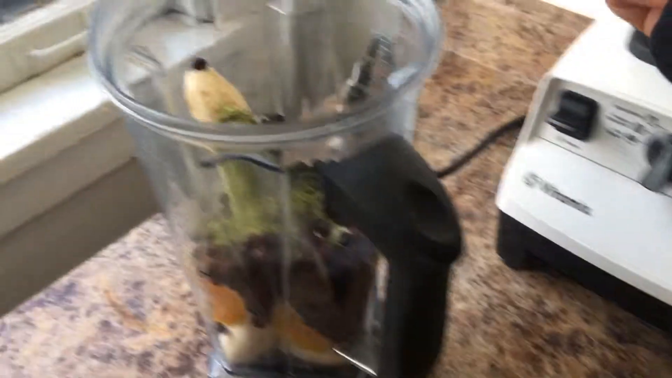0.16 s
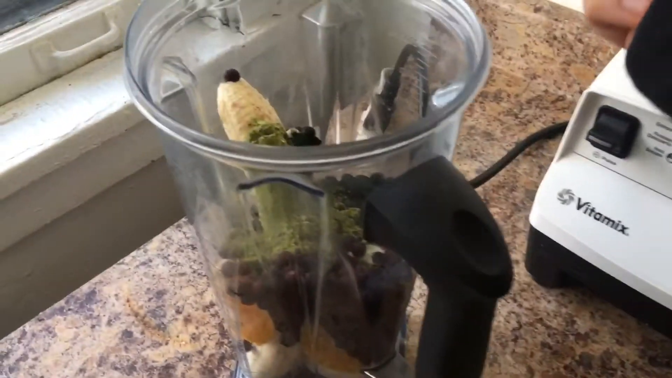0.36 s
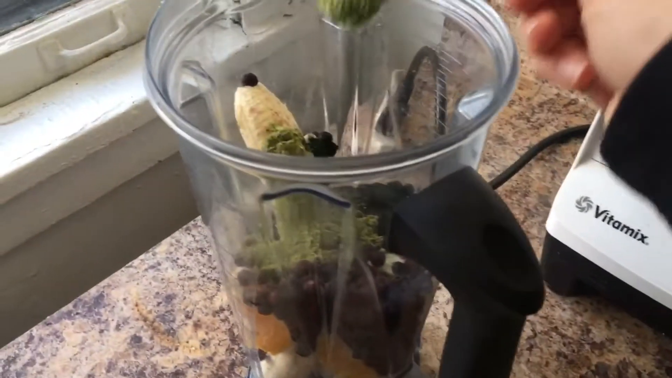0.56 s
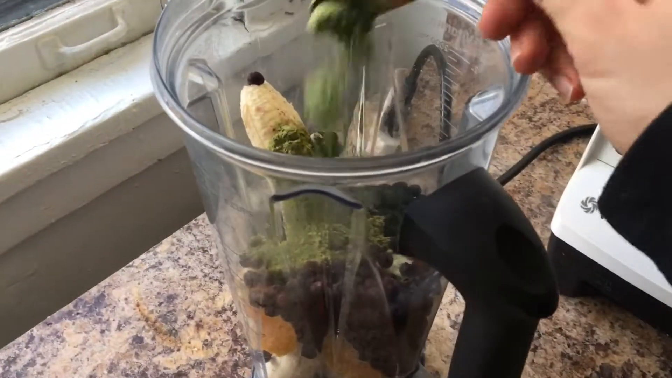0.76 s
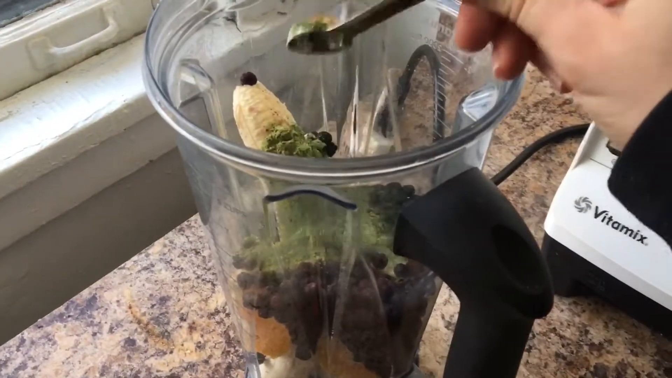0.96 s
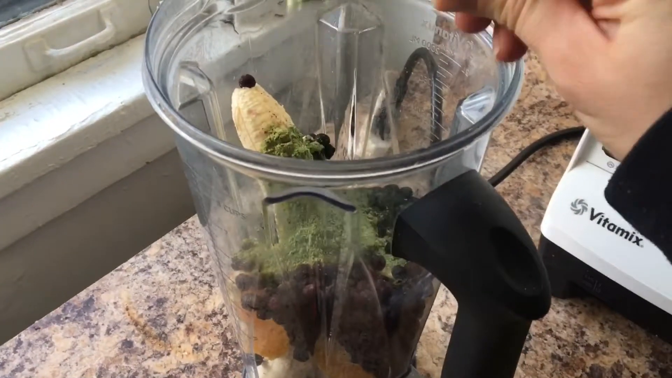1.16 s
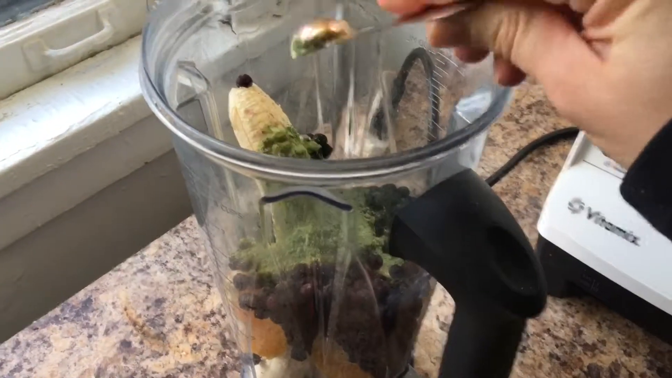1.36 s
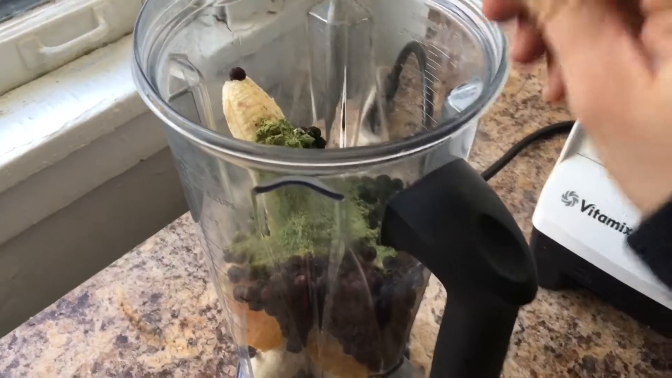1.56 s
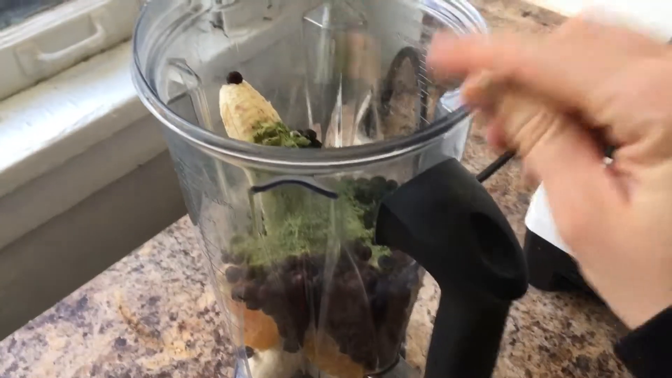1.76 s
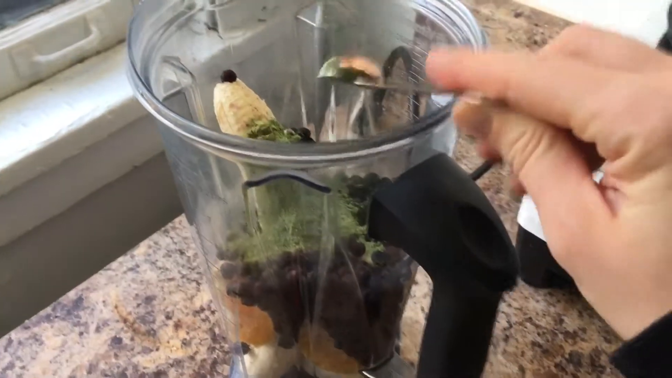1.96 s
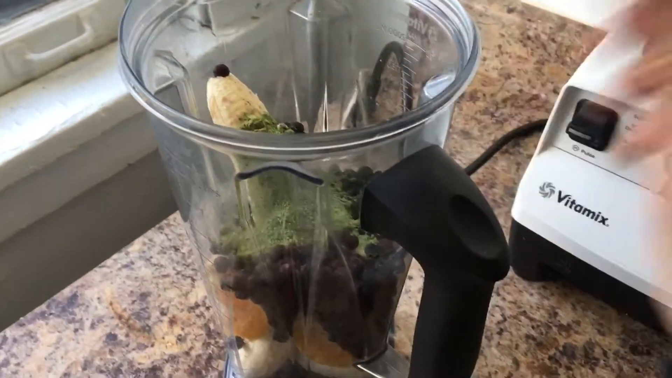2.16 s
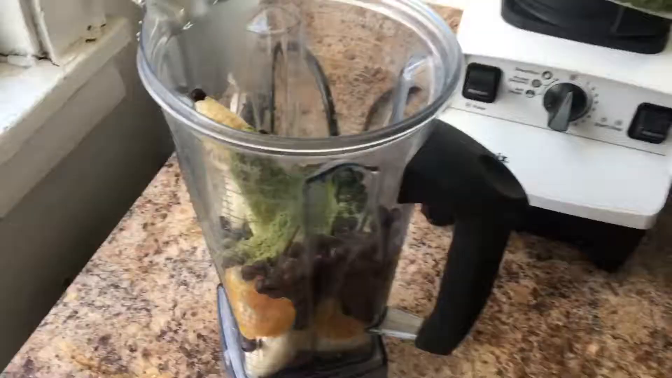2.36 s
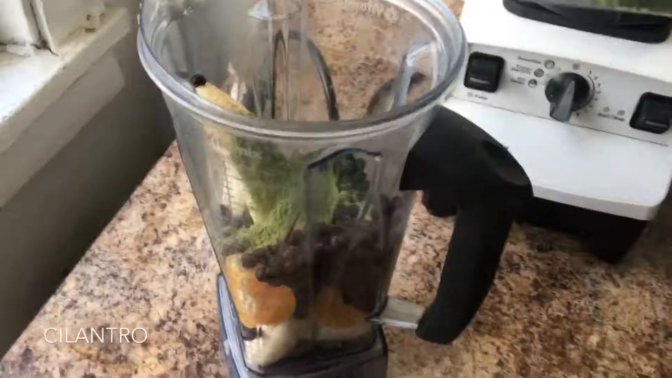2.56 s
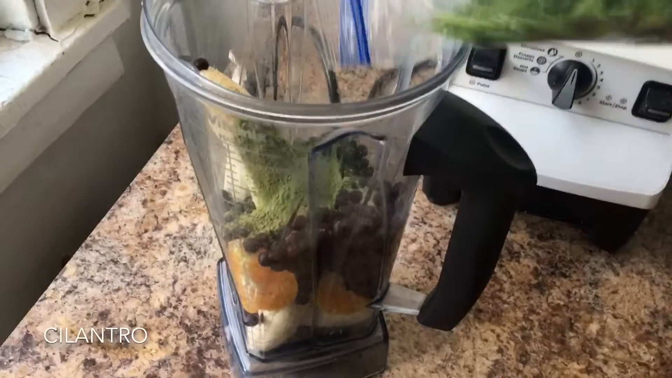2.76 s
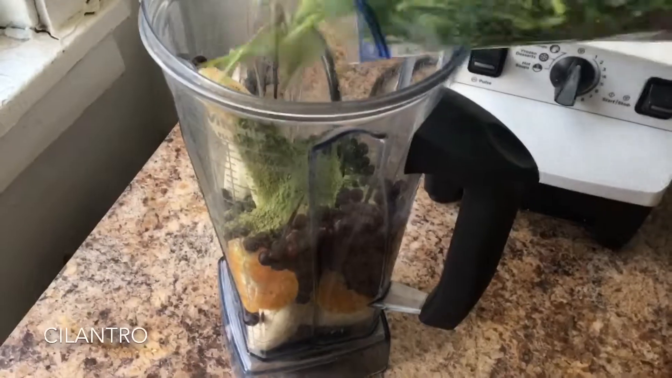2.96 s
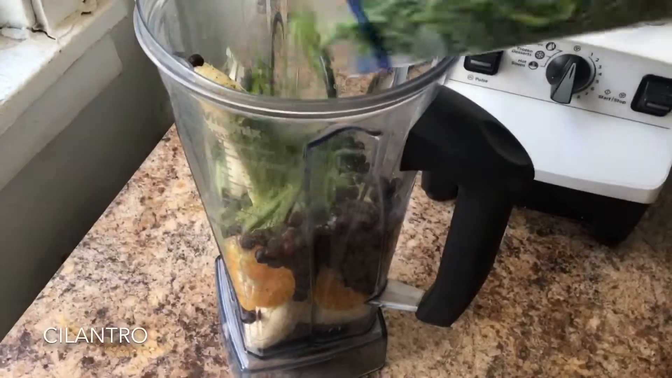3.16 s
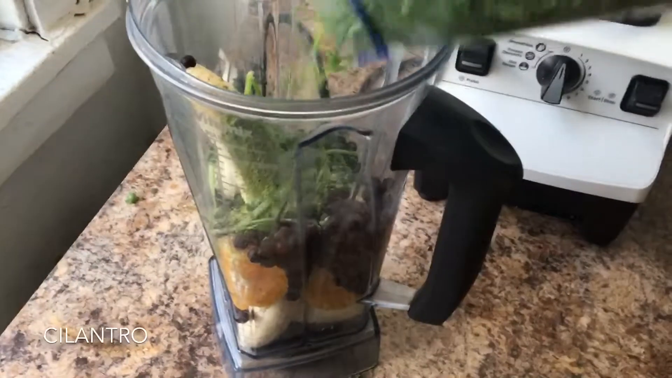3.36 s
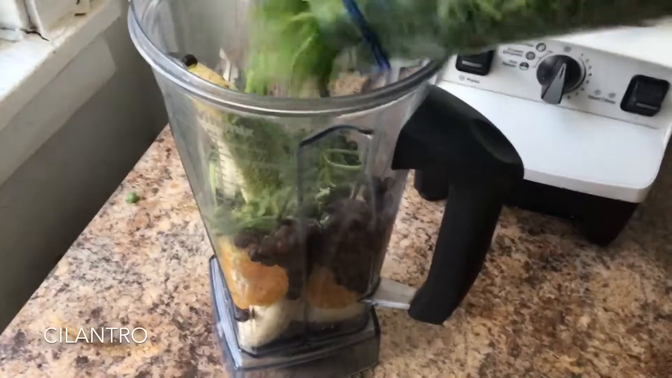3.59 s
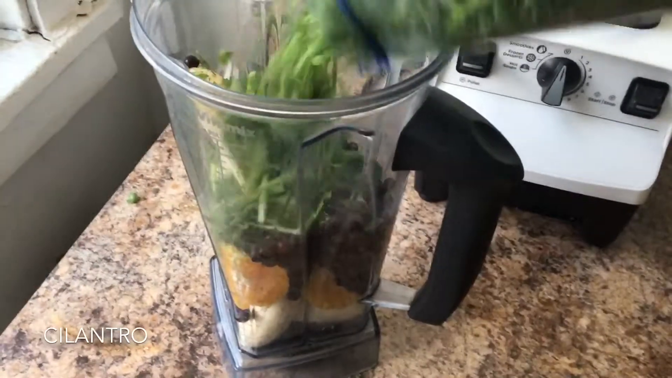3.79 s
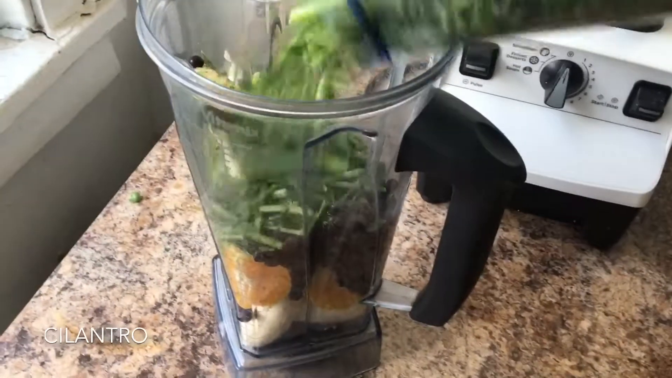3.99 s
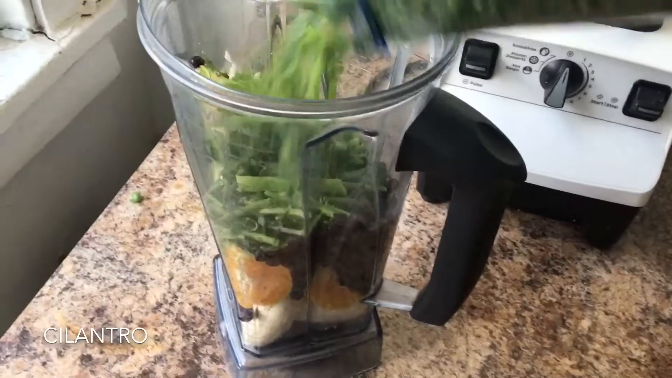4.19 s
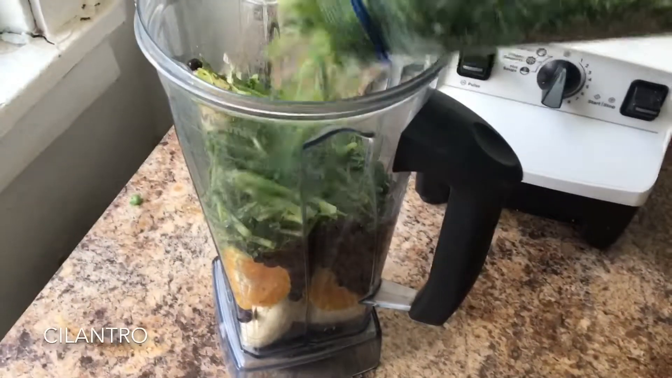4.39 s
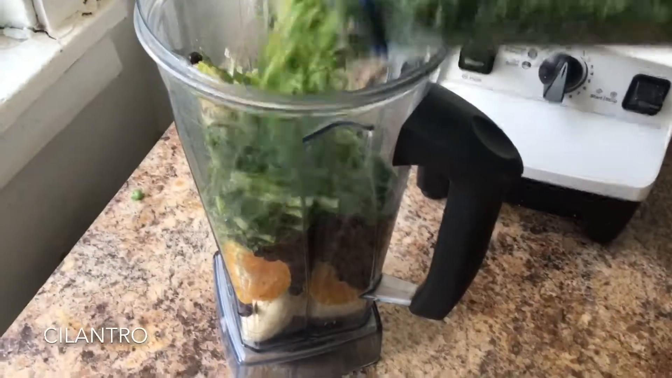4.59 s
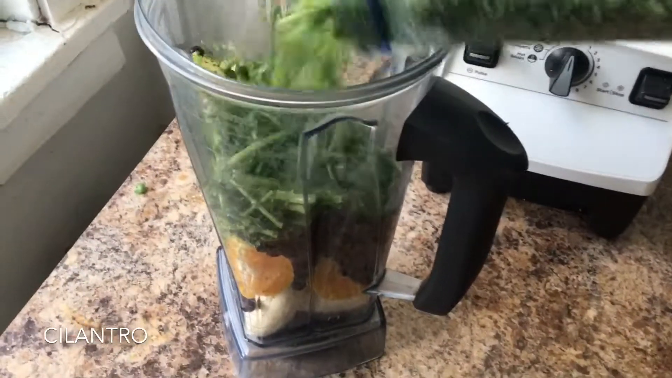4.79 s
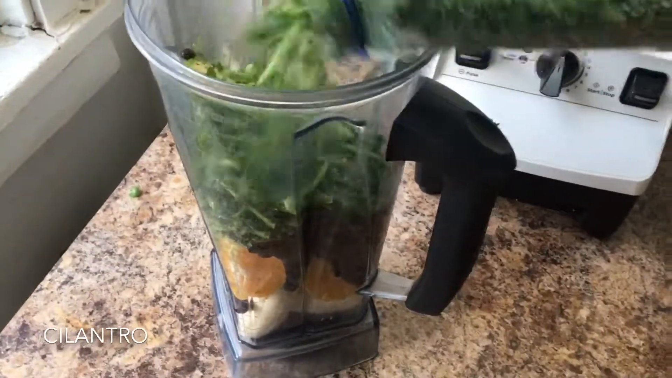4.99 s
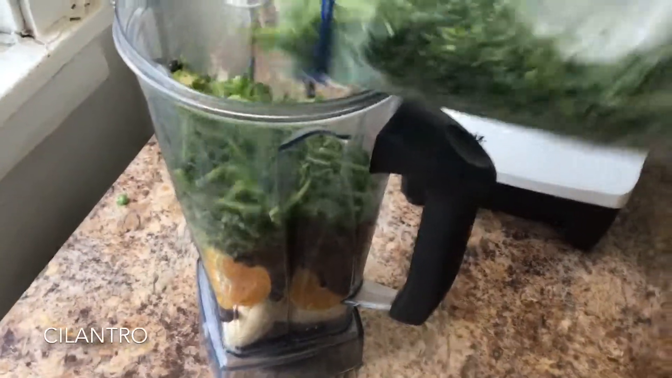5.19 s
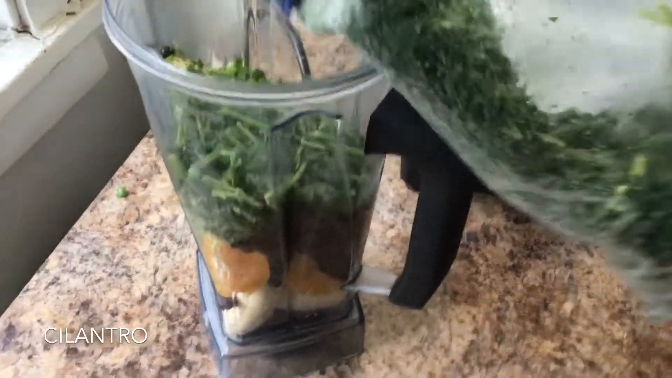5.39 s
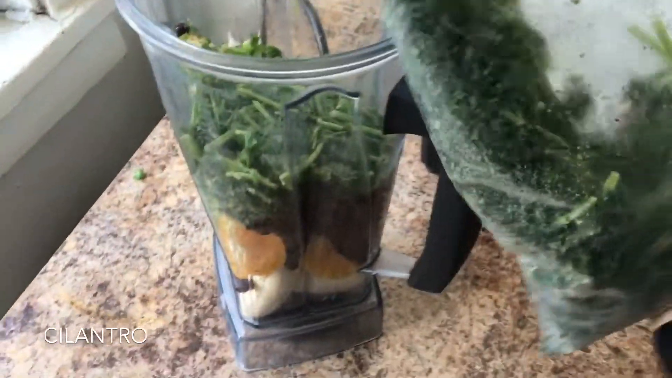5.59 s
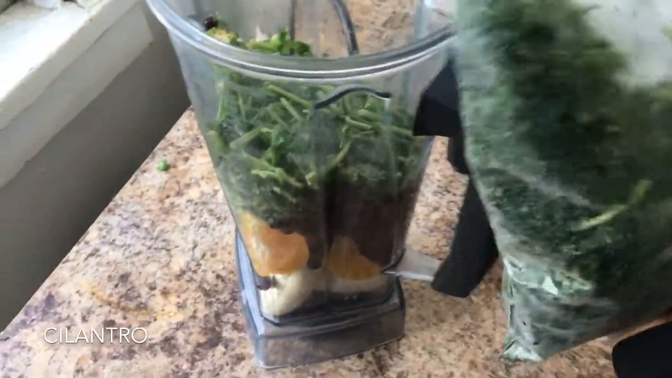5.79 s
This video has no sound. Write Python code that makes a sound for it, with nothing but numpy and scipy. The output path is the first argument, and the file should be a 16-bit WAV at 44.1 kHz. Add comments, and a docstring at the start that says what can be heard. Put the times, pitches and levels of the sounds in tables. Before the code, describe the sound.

In a small kitchen with low rumble and faint hiss, powder lands almost inaudibly in a plastic blender jar. A spoon lightly touches the rim, then knocks three times, loud and hollow with a bright clack. Then chopped herbs slide from a thin plastic bag and are shaken in, about five rustling bursts a second, with crackles and small snaps, before the bag is drawn away. Close microphone, short room reflections.

```python
"""A small kitchen, one close microphone: a plastic blender jar on a counter, over low rumble and faint hiss.
Powder drops in as a puff of noise; a spoon touches the rim, then knocks three times, ringing jar and counter modes.
Herbs slide from a thin plastic bag, are shaken in about five times a second, and the crinkling bag is drawn away:
crackles of short resonant clicks and noise bursts follow the slide and the shakes, with single snaps on top.
The air in the jar colours powder and herbs; sparse decaying reflections give the room."""
import sys
import numpy as np
from scipy import signal
from scipy.fft import rfft, irfft, next_fast_len
from scipy.io import wavfile

SR = 44100
rng = np.random.default_rng(int(sys.argv[2]) if len(sys.argv) > 2 else 0)


def generate_wav(sig):
    """Save sig (samples, or channels by samples) to the path in sys.argv[1] as 16-bit PCM at SR."""
    pcm = np.round(np.clip(np.atleast_2d(sig).T, -1, 1) * 32767).astype(np.int16)
    wavfile.write(sys.argv[1], SR, pcm)


N = 257808
TIME = np.arange(N) / SR

# spectra below are shapes only, evened out to rms 1 before a level is set
# the kitchen's background spectrum: freq_hz, density_db (per Hz)
HUM_SPECTRUM = [(12, -62), (25, -21), (42, -7), (80, -8), (120, -14.5), (229, -12), (317, -15.5),
                (450, -25.5), (680, -26), (863, -31), (1290, -30), (1600, -35.5), (3000, -41.5),
                (14000, -48), (16000, -58)]
# kitchen reverberation: freq_hz, t60_s
KITCHEN_T60 = [(60, 0.73), (250, 0.28), (700, 0.18), (2000, 0.36), (5000, 0.17), (14000, 0.32)]
# air resonances of the open jar: freq_hz, width_hz, level_db (over the direct sound)
JAR_AIR = [(295, 30, 6), (551, 99, -7.5), (882, 50, -1), (1232, 59, -4.5), (2180, 150, -2),
           (3190, 46, -3.5)]
# soft landings in the jar, herbs or powder, spectrum: freq_hz, density_db (per Hz)
THUD_SPECTRUM = [(27, -24), (42, 1.5), (60, -1.5), (110, -6.5), (170, -3.5), (220, -2), (290, -7),
                 (400, -4), (900, -40)]
# a spoonful of powder dropping softly into the jar: centre_s, spread_s, level_db
SPOONFUL = (0.83, 0.079, -63)
# spoon on the rim: start_s, strength_db, brightness_db (per octave), clatter_db (relative to the blow)
KNOCKS = [(1.7301, -30.5, 0.6, -2.5), (1.8702, -2.55, 1, -4.5), (2.0218, -4, 1.1, -8),
          (2.1353, -4.5, 2.5, -4)]
# jar standing on the counter, struck at the rim: pitch_hz, width_hz, level_db (mean over blows), delay_s
JAR_MODES = [(54, 10, 22, .022), (151, 15, 20, .012), (303, 30, 20.5, .005), (421, 50, 19.5, .007),
             (533, 60, 21, .003), (646, 100, 19.5, .003), (955, 200, 10, .003), (1305, 120, 21.5, .0046),
             (1430, 200, 12, .004), (1662, 90, 14, .003), (2010, 200, 20.5, .0013),
             (2220, 170, 23.5, .0014), (2855, 250, 6, .0015), (3560, 280, 12.5, .0013),
             (4560, 300, 6.5, .0015), (5420, 450, -1, .0014), (7020, 420, 2, .001), (8850, 550, -1, .0004),
             (11850, 700, -7, .0002)]
# the steel spoon's own thin ring: pitch_hz, width_hz, level_db
SPOON_RING = [(12030, 12, 3)]
# what a knock sends into the room, spectrum: freq_hz, density_db (per Hz)
KNOCK_ROOM = [(27, -21), (40, 4), (60, -3), (150, 3.5), (230, -0.5), (600, 5.5), (1080, -8.5), (1330, 2),
              (1750, -4), (2150, 0), (2650, -14), (3700, -4.5), (5500, -12.5), (9000, -26.5), (15000, -54)]
# a crease flips or a stem hits the wall: start_s, level_db (before the common trim in snaps()), pitch_hz,
# slope_db (per octave above the pitch)
SNAPS = [(2.474, -39, 2000, -3), (3.021, -29, 3000, -4), (3.084, -25, 2500, -4), (3.152, -20.5, 1800, -5),
         (3.177, -28, 9000, -3), (3.1927, -20, 2700, -4.5), (3.456, -23, 2600, -6),
         (3.7335, -25.5, 1450, -3), (3.773, -27, 1700, -4), (3.889, -21, 1600, -9), (4.131, -28, 10500, -3),
         (4.270, -26, 1000, -6), (4.288, -19, 850, -5), (4.564, -26.5, 1300, -4), (4.759, -28, 750, -7),
         (4.907, -26.5, 2000, -6), (5.107, -33, 3500, -2), (5.165, -35.5, 2500, -3),
         (5.1915, -32, 1850, -5), (5.213, -29.5, 2200, -3), (5.305, -34, 2500, -4), (5.334, -36, 6000, -3),
         (5.547, -35, 1600, -5), (5.6105, -27.5, 1350, -7.5), (5.6535, -26, 1750, -4)]
# colour of the leaves: freq_hz, density_db (per Hz)
LEAF_SPECTRUM = [(100, -12), (250, -16), (560, -2.5), (730, -2), (1050, 0), (1400, 1.5), (1750, -2.5),
                 (2400, -3), (2800, -5), (4200, -4), (4900, -14.5), (6000, -10.5), (7500, -12),
                 (12000, -20)]
# colour of the bag's film: freq_hz, density_db (per Hz)
FILM_SPECTRUM = [(1000, -35), (4500, -6.5), (6300, -5.5), (7500, -8.5), (9000, -4.5), (9900, -8),
                 (10500, -12), (11300, -6.5), (13000, -8.5), (16000, -14.5)]
# steady slide of herbs along the tilted bag, then the bag drawn away: time_s, level_db (before layer trims)
SLIDE = [(2.46, -56), (2.62, -37.5), (2.81, -34), (3.0, -30.5), (3.13, -36.5), (3.54, -41.5), (4.35, -39),
         (4.51, -46.5), (4.92, -43.5), (5.16, -52), (5.33, -51.5), (5.37, -53), (5.55, -43.5), (5.85, -40)]
# how strongly the film crinkles beside the leaves, rising and falling through the pour:
# time_s, film_db (relative to the slide, before layer trims)
FILM_BALANCE = [(2.55, -9), (3.25, -4), (3.56, -8.5), (3.8, 1), (4.35, -1.5), (5.13, 4.5), (5.4, -3),
                (5.85, -1)]
# shakes of the bag: full_speed_s, rustle_db, crinkle_db (both before layer trims), thud_db, hold_s
SHAKES = [(2.498, -46.5, -50, -59, 0.02), (2.597, -43, -55, -46, 0.015), (2.78, -32, -40, -41, 0.013),
          (2.837, -30, -38, -51, 0.013), (2.961, -29, -48, -38, .025), (3.048, -34, -40, -70, .03),
          (3.242, -38.5, -41.5, -50, 0.06), (3.428, -32.5, -37, -48, 0.024),
          (3.616, -24.5, -31, -39.5, 0.02), (3.778, -30.5, -36.5, -45.5, 0.057),
          (4.004, -30, -33.5, -45, 0.013), (4.189, -30.5, -35, -46, 0.0053),
          (4.388, -29, -30.5, -42.5, 0.016), (4.571, -36, -36, -55, 0.042), (4.69, -60, -41, -54, 0.0088),
          (4.792, -34, -35, -44, .028), (4.98, -35.5, -37, -49, 0.024), (5.086, -47, -40.5, -68, .01),
          (5.225, -44, -43, -63, 0.03)]

HUM_DB, HUM_POUR_DB = -56, -58.5  # background level up to the dip and from there on
DIP_S, DIP_WIDTH_S, DIP_DB = 2.442, 0.012, -12  # the background dips briefly just before the pour
POUR_START_S = 2.452
SHAKE_RISE_S, SHAKE_SETTLE_S = 0.014, 0.031  # exponential time constants of each shake
FALL_S = 0.011  # leaves shaken loose land this much later
LANDING_DB = -9  # thud of the leaves that slide out at the pour's start, relative to the slide
HEAP_DB_PER_S = 1.24  # the growing heap cushions what slides out
CATCH_DB, CATCH_HZ = 1.16, 34.6  # leaves catch and slip: rms depth and top rate of the unevenness
EDGE_HZ = 16050  # upper band edge of the recorder


def gain_of(db):
    """Decibels to amplitude."""
    return 10 ** (np.asarray(db) / 20)


def evened(x):
    """Scales to rms 1."""
    return x / np.sqrt(np.mean(x ** 2) + 1e-20)


def read(points, hz):
    """Reads a table on a logarithmic frequency axis."""
    freq_hz, value = np.transpose(points)
    return np.interp(np.log(hz + 1), np.log(freq_hz + 1), value)


def curve(rows):
    """Reads a timed table at every sample."""
    return np.interp(TIME, *np.transpose(rows))


def add(mix, start_s, sound):
    """Mixes a sound in at its start time, cut off at the end of the mix."""
    part = mix[round(start_s * SR):][:len(sound)]
    part += sound[:len(part)]


def coloured(x, spectrum):
    """Gives x a spectral colour, at rms 1."""
    hz = np.fft.rfftfreq(len(x), 1 / SR)
    return evened(irfft(rfft(x) * gain_of(read(spectrum, hz)), len(x)))


def resonances(modes, hz):
    """Complex response of each damped mode, its table level reached at its own pitch."""
    return [gain_of(db) * 1j * width * hz / (f ** 2 - hz ** 2 + 1j * width * hz)
            for f, width, db in modes]


def background():
    """Low steady rumble of the room under a faint hiss; it dips briefly and then stays a little lower."""
    dip_db = DIP_DB * np.exp(-((TIME - DIP_S) / DIP_WIDTH_S) ** 2)
    steady_db = np.where(TIME < DIP_S, HUM_DB, HUM_POUR_DB)
    return coloured(rng.standard_normal(N), HUM_SPECTRUM) * gain_of(steady_db + dip_db)


def kitchen(first_s):
    """The room's answer to a click: reflections of random sign, each band dying at its own speed."""
    size = SR // 2
    signs = rng.choice([-1., 1.], size)
    present = rng.random(size) < 1 / 10
    taps = signs * present * (TIME[:size] > first_s)
    hz, t, bands = signal.stft(taps, SR, nperseg=256)
    decay = gain_of(-60 * t / read(KITCHEN_T60, hz)[:, None])
    tail = signal.istft(bands * decay, SR)[1]
    return tail / np.linalg.norm(tail)


def hollow(x):
    """The air in the jar rings along with whatever sounds at its mouth."""
    size = next_fast_len(N + SR // 4)  # room for the ring to die away
    hz = np.fft.rfftfreq(size, 1 / SR)
    response = 1 + sum(resonances(JAR_AIR, hz))
    return irfft(rfft(x, size) * response, size)[:N]


def powder():
    """Loose powder lands in the jar with a dull puff: low noise that swells and fades."""
    centre_s, spread_s, db = SPOONFUL
    puff = np.exp(-((TIME - centre_s) / spread_s) ** 2)
    return coloured(rng.standard_normal(N), THUD_SPECTRUM) * gain_of(db) * puff


def spoon(clatter_s=0.0019, room_db=-39.5):
    """Each blow sets the jar's modes going, the counter last; the jar chatters on its base."""
    size, out = SR, np.zeros(N)
    hz, t = np.fft.rfftfreq(size, 1 / SR), TIME[:SR // 16]
    modes = np.array(JAR_MODES)
    delay = np.exp(-2j * np.pi * hz * modes[:, 3:])
    soft_start = 1 / (1 + 1j * hz / (2 * modes[:, :1]))  # so that no mode starts with a click
    shapes = np.array(resonances(modes[:, :3], hz)) * delay * soft_start
    ring = sum(resonances(SPOON_RING, hz))
    for start_s, db, bright_db, clatter_db in KNOCKS:
        shares = gain_of(rng.standard_normal(len(modes)))  # no two blows land on the same spot
        force = gain_of(db + bright_db * np.log2((hz + 100) / 1500))
        blow = irfft((shares @ shapes + ring) * force, size)
        chatter = rng.standard_normal(len(t)) * t * np.exp(-t / clatter_s)
        chatter /= np.linalg.norm(chatter)
        room = coloured(kitchen(first_s=0.003), KNOCK_ROOM)[:SR * 2 // 5]
        add(out, start_s, blow)
        add(out, start_s, gain_of(clatter_db) * signal.fftconvolve(blow, chatter))
        add(out, start_s, gain_of(db + room_db) * room)
    return out


def crackle(per_s, spread_db, cycles, low_hz, high_hz, count):
    """Small facets buckle at random, each ringing a few cycles at one of count pitches; a few buckle hard."""
    out = np.zeros(N)
    for hz in np.geomspace(low_hz, high_hz, count):
        chance = rng.random(N) * count * SR / per_s  # below 1 where a facet buckles
        moments = np.flatnonzero(chance < 1)
        hardness = np.minimum(-np.log(chance[moments]), 4)
        clicks = np.zeros(N)
        clicks[moments] = (-1.) ** moments * gain_of(spread_db * hardness)
        angle = 2 * np.pi * hz / SR
        fade = np.exp(-hz / cycles / SR)
        out += signal.lfilter([angle, 0, -angle], [1, -2 * fade * np.cos(angle), fade ** 2], clicks)
    return evened(out)


def creases(per_s=70, spread_db=3, ring_s=0.0023):
    """Longer folds give way now and then as decaying noise, heard from bass to treble at once."""
    t = TIME[:SR // 100]
    sizes = gain_of(spread_db * np.minimum(rng.exponential(1, N), 3))
    folds = sizes * (rng.random(N) < per_s / SR)
    envelope = signal.oaconvolve(folds, np.exp(-t / ring_s))[:N]
    return evened(envelope * rng.standard_normal(N))


def catching():
    """Uneven gain of leaves that catch and slip: slow noise in decibels."""
    slow = np.fft.rfftfreq(N, 1 / SR) < CATCH_HZ
    return gain_of(CATCH_DB * evened(irfft(rfft(rng.standard_normal(N)) * slow, N)))


def shaking(axis, late_s):
    """Sum of all shakes: quick rise, hold, slower settling; axis picks the column of strengths."""
    out = np.zeros(N)
    for row in SHAKES:
        t, hold_s = TIME - row[0] - late_s, row[-1]
        rise = np.minimum(t, 0) / SHAKE_RISE_S
        settle = np.maximum(t - hold_s, 0) / SHAKE_SETTLE_S
        out += gain_of(row[axis]) * np.exp(rise - settle)
    return out


def snaps(ring_s=0.0026, level_db=-16.0):
    """A crease flips or a stem hits the wall: a short burst around its own pitch, dull or bright."""
    out, t = np.zeros(N), TIME[:SR // 25]
    for start_s, db, hz, slope_db in SNAPS:
        colour = [(hz / 8, -20), (hz / 2, -7), (hz, 0), (hz * 2 ** 4, 4 * slope_db)]
        burst = coloured(rng.standard_normal(len(t)), colour) * np.exp(-t / ring_s)
        add(out, start_s, gain_of(db + level_db) * evened(burst))
    return out


def herbs(leaves_db=-1.73, film_db=-1.5, folds_db=-7.0, stems_db=-8):
    """Leaves rub, film crinkles and clumps drop softly into the jar, all following slide and shakes."""
    folds = gain_of(folds_db) * creases()
    stems = crackle(per_s=260, spread_db=3.0, cycles=2.9, low_hz=413, high_hz=6840, count=16)
    facets = crackle(per_s=6000, spread_db=1.0, cycles=1.97, low_hz=241.5, high_hz=8230, count=18)
    leaves = coloured(folds + gain_of(stems_db) * stems + facets, LEAF_SPECTRUM)
    crinkles = crackle(per_s=12000, spread_db=2.0, cycles=0.42, low_hz=4000, high_hz=14900, count=7)
    film = coloured(folds + crinkles, FILM_SPECTRUM)
    drops = crackle(per_s=900, spread_db=1.5, cycles=0.79, low_hz=54.0, high_hz=472, count=5)
    clumps = coloured(drops, THUD_SPECTRUM)

    # slide and shakes add as powers
    slide = gain_of(curve(SLIDE)) * catching()
    rubbing = np.hypot(slide, shaking(axis=1, late_s=0))
    flexing = np.hypot(slide * gain_of(curve(FILM_BALANCE)), shaking(axis=2, late_s=0))
    landing = gain_of(LANDING_DB - HEAP_DB_PER_S * (TIME - POUR_START_S))
    falling = np.hypot(slide * landing, shaking(axis=3, late_s=FALL_S))
    bag = leaves * rubbing * gain_of(leaves_db) + film * flexing * gain_of(film_db)
    return (bag + clumps * falling) * (TIME > POUR_START_S)


def scene():
    """Background, knocks and rustle with their reflections, the same in both channels."""
    rustle = hollow(herbs() + snaps() + powder())
    reflections = gain_of(-8.5) * signal.fftconvolve(rustle, kitchen(first_s=0.00219))[:N]
    return np.tile(spoon() + rustle + reflections + background(), (2, 1))


def record(dry):
    """The recorder's band limit: a steep low-pass that keeps the timing."""
    lowpass = signal.firwin(511, EDGE_HZ, window=("kaiser", 9), fs=SR)
    return signal.oaconvolve(dry, lowpass[None], "same")


dry = scene()
out = record(dry)
generate_wav(out)
```